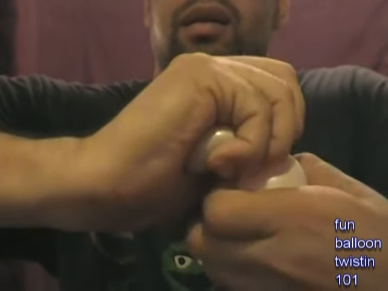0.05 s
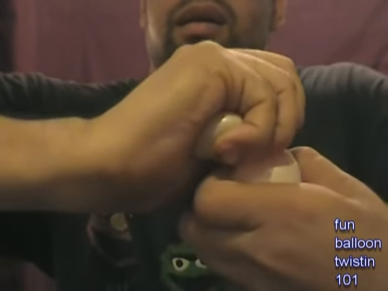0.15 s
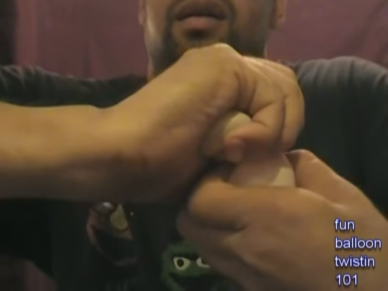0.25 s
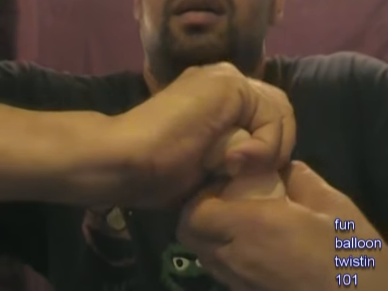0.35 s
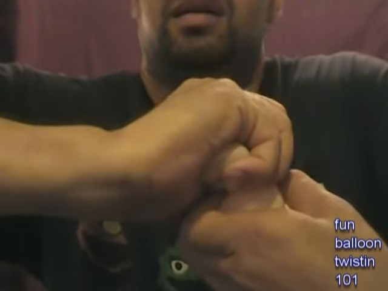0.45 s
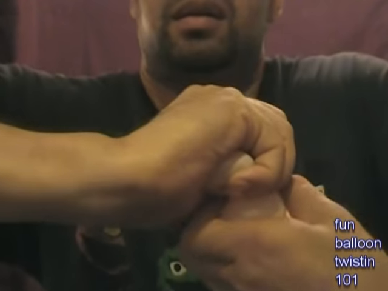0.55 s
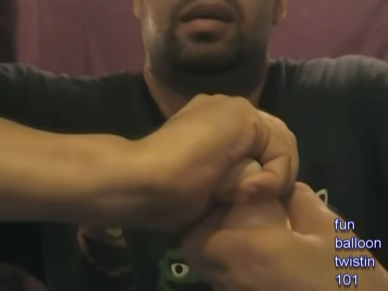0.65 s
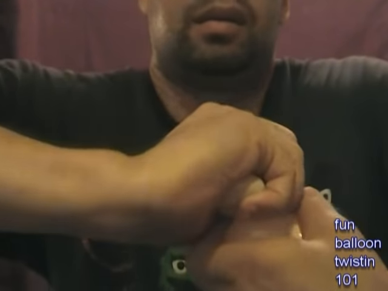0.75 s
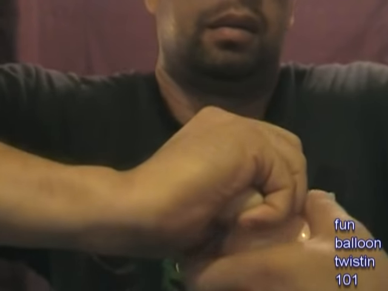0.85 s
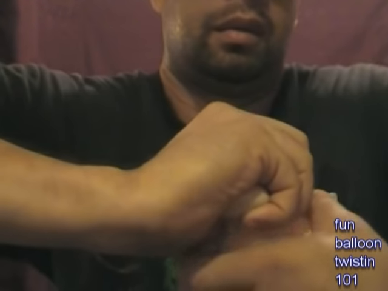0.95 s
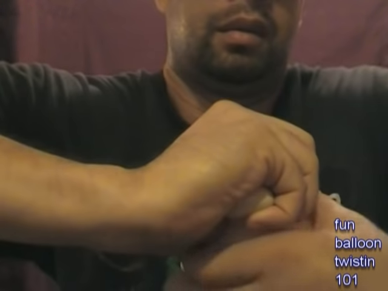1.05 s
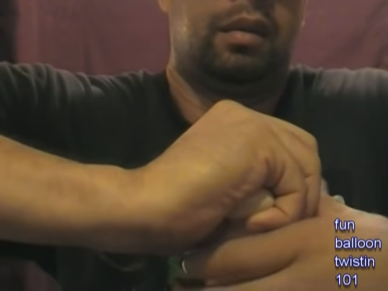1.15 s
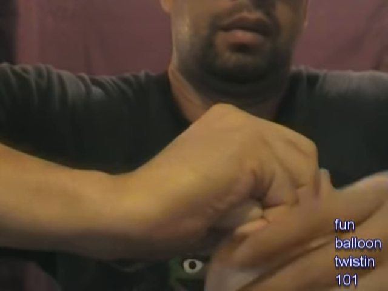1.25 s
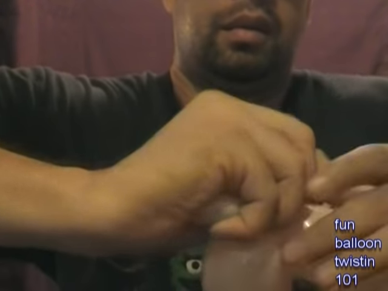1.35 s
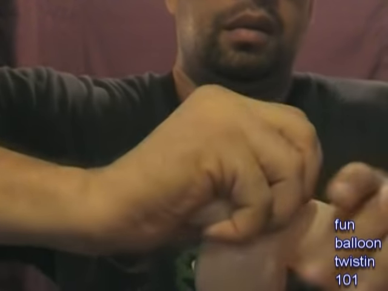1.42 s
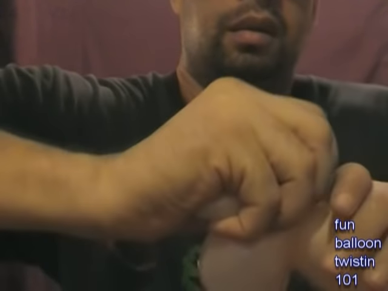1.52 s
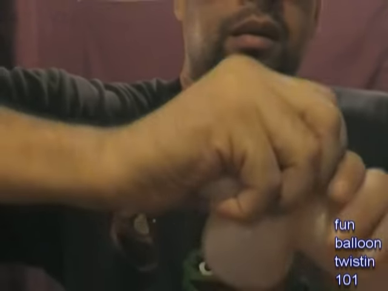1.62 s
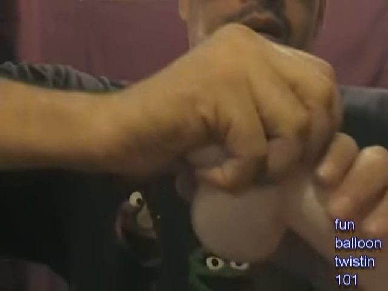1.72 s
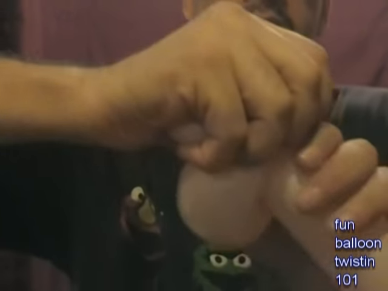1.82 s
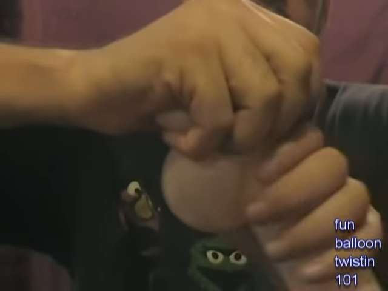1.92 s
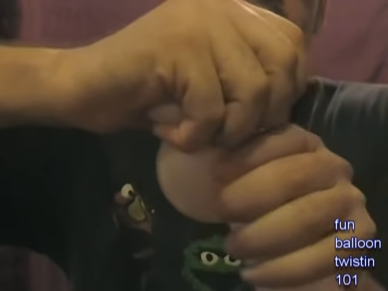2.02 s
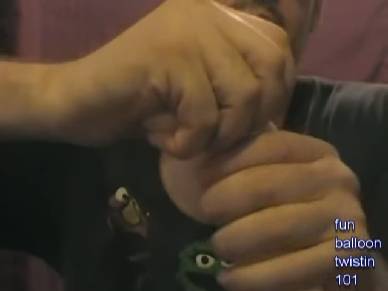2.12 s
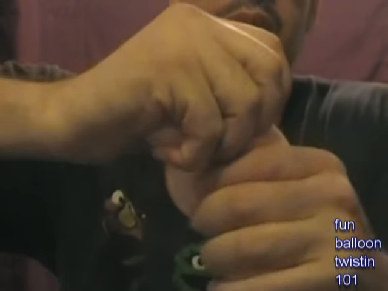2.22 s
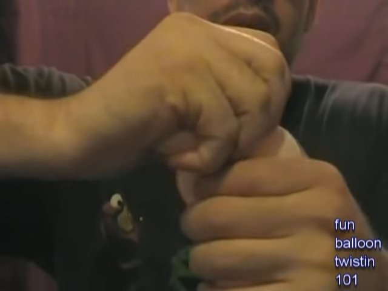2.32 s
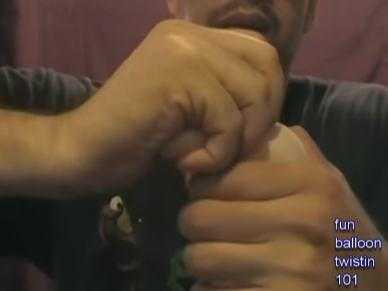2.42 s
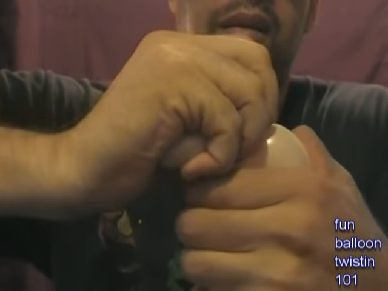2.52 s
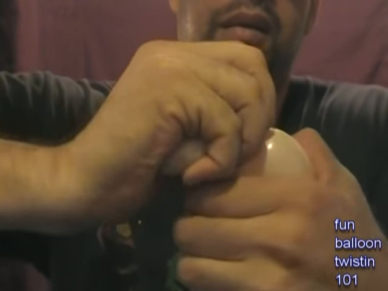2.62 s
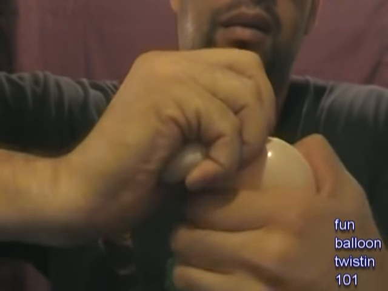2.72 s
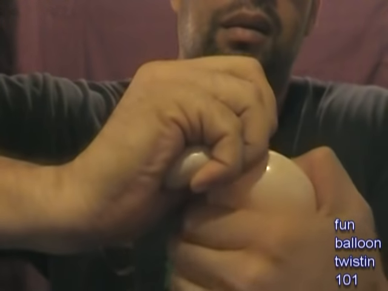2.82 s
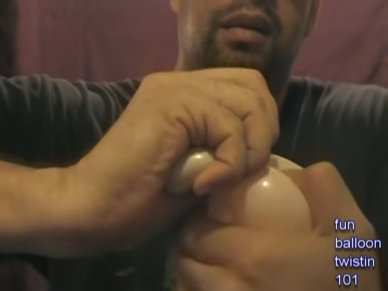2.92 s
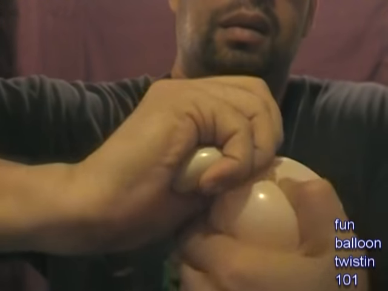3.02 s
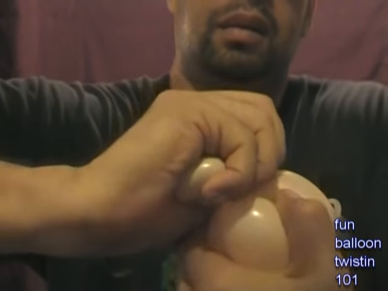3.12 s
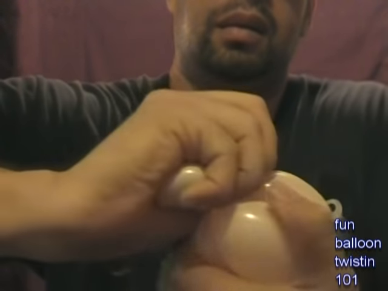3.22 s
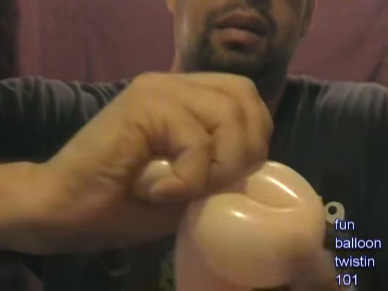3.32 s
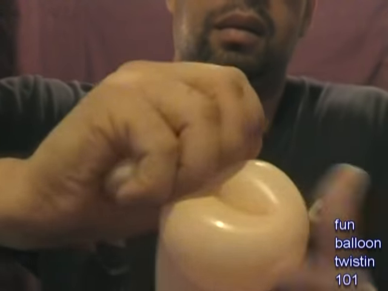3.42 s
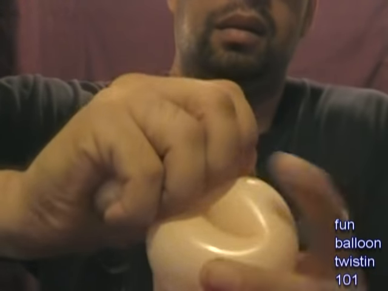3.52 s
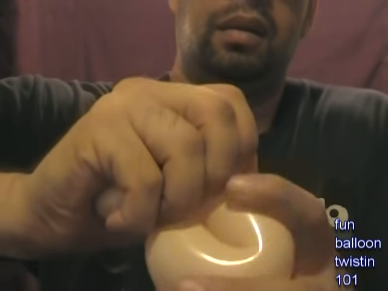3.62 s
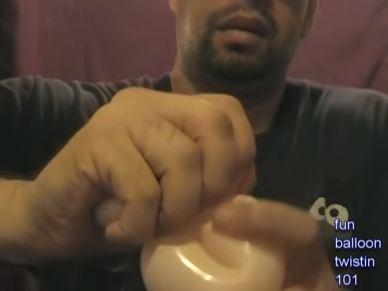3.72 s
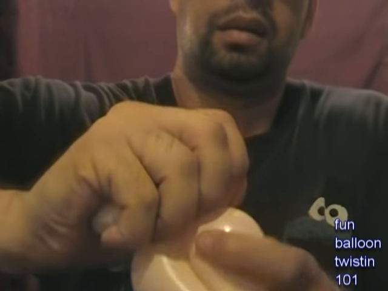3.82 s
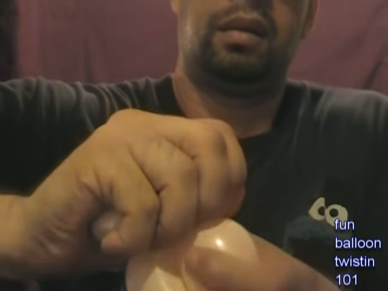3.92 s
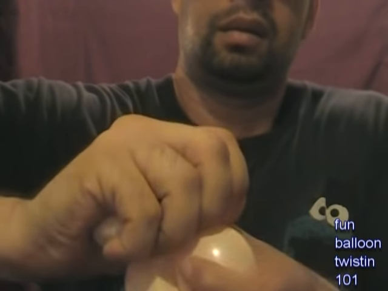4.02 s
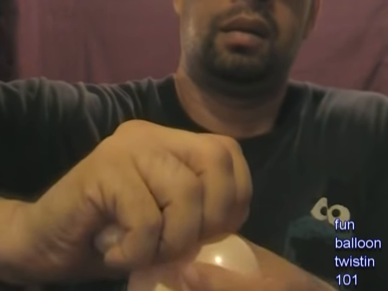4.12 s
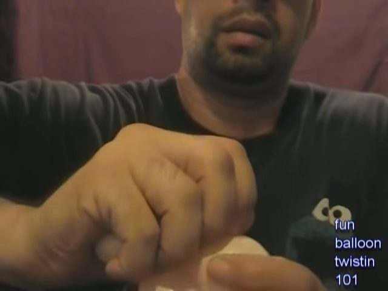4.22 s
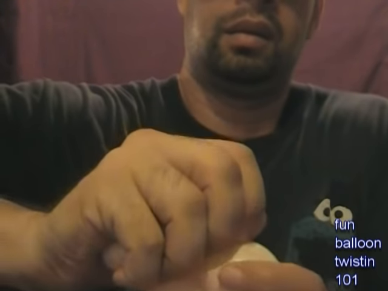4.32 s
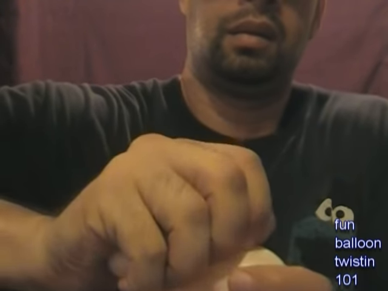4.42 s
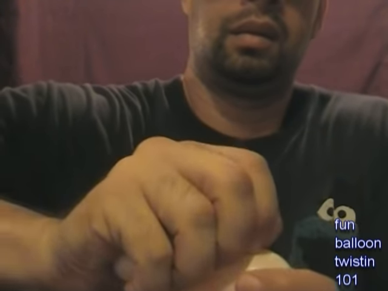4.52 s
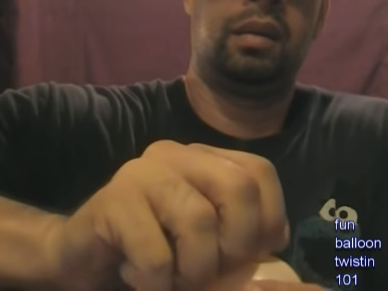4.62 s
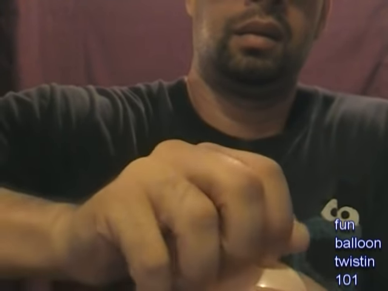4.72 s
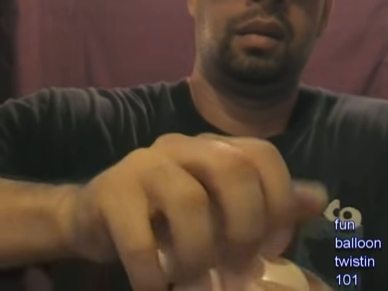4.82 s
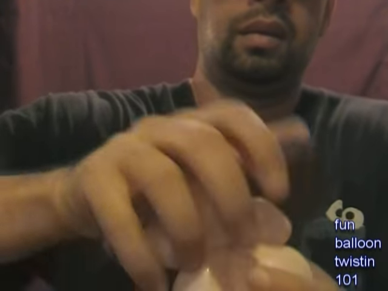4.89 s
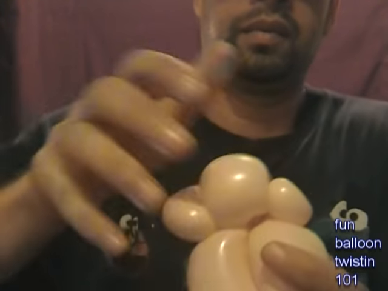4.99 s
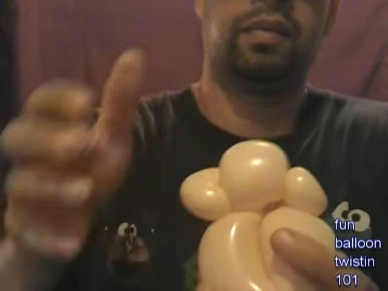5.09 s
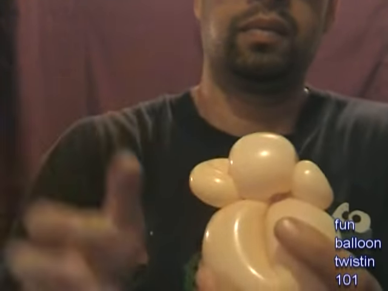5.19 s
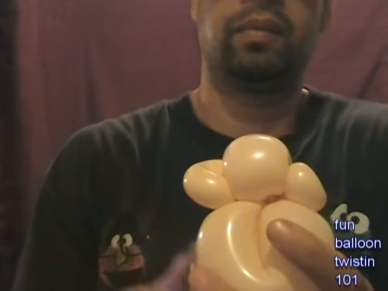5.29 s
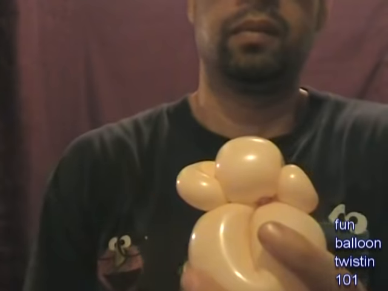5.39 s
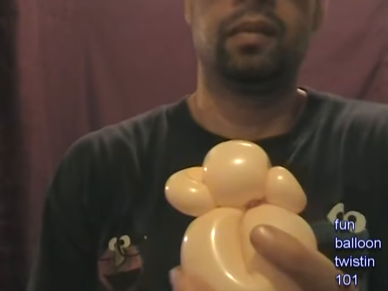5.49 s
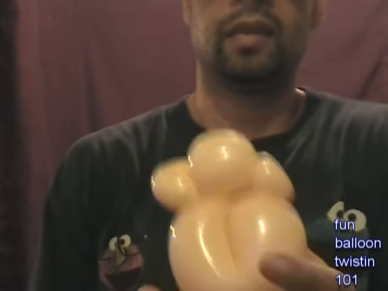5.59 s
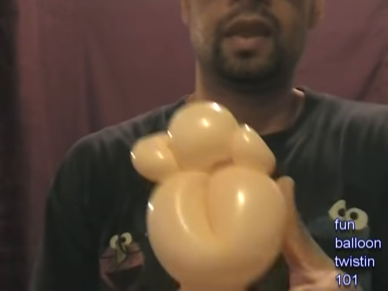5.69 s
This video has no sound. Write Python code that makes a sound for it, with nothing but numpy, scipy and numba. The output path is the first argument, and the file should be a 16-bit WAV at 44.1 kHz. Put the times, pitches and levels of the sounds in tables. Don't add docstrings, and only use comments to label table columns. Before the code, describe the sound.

An inflated balloon is squeezed and twisted by hand in a small damped room, heard very close in stereo. Scratchy rubs and sharp snaps come first, then a loud stuttering creak just after two seconds, a softer lull with knocks, more squeaks and a dense crinkling patch, and finally sparse fingertip ticks over faint room tone.

```python
import sys
import numpy as np
from scipy import signal
from scipy.fft import rfft, irfft, next_fast_len
from scipy.io import wavfile
from scipy.ndimage import uniform_filter1d
from numba import njit

SR = 44100
rng = np.random.default_rng(int(sys.argv[2]) if len(sys.argv) > 2 else 0)


def materialize(psi):
    bounded = np.clip(np.atleast_2d(psi).T, -1, 1)
    quanta = np.round(bounded * 32767).astype(np.int16)
    wavfile.write(sys.argv[1], SR, quanta)


def makeup_ratio(level_db):
    decades = np.asarray(level_db, float) / 20
    return 10 ** decades


N = 253575

# freq_hz, density_db
ROOM_TONE = [(24, -15), (40, -8), (144, -5), (180, -3.5), (402, -13), (1090, -11.5), (3740, -24.5),
             (7930, -33), (16000, -48)]
ROOM_TONE_DB = -59.5
ROOM_T60_S, ROOM_DB, ROOM_LOW_HZ, ROOM_HIGH_HZ = .15, -11, 78, 9600
# freq_hz, left_minus_right_db
PORT_TILT = [(150, -1), (380, 3), (1290, 1.5), (2380, 2.5), (4400, -1), (8100, -3), (13000, 4.5)]

# start_s, peak_db, pitch_hz, t60_s
HAND_KNOCKS = [(0.802, -40, 252, 0.056), (1.021, -48, 106, 0.19), (1.378, -27, 230, 0.04),
               (1.705, -25, 594, 0.026), (1.732, -24, 530, 0.033), (1.752, -23, 525, 0.036),
               (2.001, -29, 207, 0.041), (3.25, -25.5, 560, 0.046), (3.363, -34, 250, .04),
               (3.386, -36, 242, 0.058), (3.429, -35, 235, .1), (1.424, -36, 280, .04),
               (4.956, -31.5, 194, 0.031), (4.847, -16, 483, 0.014), (4.849, -32, 205, 0.041),
               (5.541, -20, 545, 0.015), (5.63, -22, 130, 0.14), (5.629, -38, 70, .07),
               (3.42, -55, 100, .2)]

# start_s, end_s, from_hz, to_hz, level_db
PINCHED_FOLDS = [(1.949, 1.988, 7300, 7100, -22), (0.249, 0.374, 8100, 8500, -30.5),
                 (0.824, 0.89, 840, 860, -36.5), (0.907, 1.001, 1400, 1980, -33),
                 (1, 1.029, 790, 780, -28.5), (1.269, 1.286, 1670, 1800, -44),
                 (1.533, 1.565, 1830, 1900, -33.5), (2.02, 2.129, 3090, 3140, -25),
                 (2.06, 2.135, 2120, 1810, -32.5), (2.06, 2.135, 4000, 4800, -27.5),
                 (2.4, 2.45, 7200, 6500, -34), (2.16, 2.36, 4100, 4300, -41), (2.9, 3.09, 3700, 3770, -32),
                 (3.76, 3.83, 8650, 8800, -33), (3.96, 4.0, 8300, 6500, -31), (1.83, 1.87, 4200, 4200, -34),
                 (4.25, 4.41, 3350, 3560, -36.5), (3.283, 3.325, 473, 360, -36.5),
                 (3.262, 3.335, 910, 670, -36), (3.37, 3.43, 1480, 1570, -46.5),
                 (3.37, 3.47, 5050, 4950, -37), (3.37, 3.47, 4200, 4240, -37),
                 (2.51, 2.59, 1100, 1090, -27), (4.18, 4.27, 2300, 2200, -33), (3.93, 4.0, 2000, 2100, -31),
                 (4.72, 4.78, 7000, 7100, -30), (2.92, 3.0, 2300, 2100, -30),
                 (3.641, 3.653, 3600, 3830, -22), (4.702, 4.764, 3800, 3640, -21),
                 (4.675, 4.786, 5800, 6700, -32), (4.865, 4.893, 6500, 6700, -35),
                 (4.918, 4.966, 2100, 1480, -33)]
FOLD_LOSS, FOLD_GRIP_HZ = .2, 40

# time_s, pitch_hz
BUBBLE_PITCH = [(0, 1320), (.75, 1620), (.85, 980), (1.05, 845), (1.1, 1430), (1.8, 1470), (2.0, 970),
                (2.47, 1010), (2.66, 1120), (2.85, 960), (3.15, 920), (3.25, 1190), (3.6, 1360),
                (3.72, 800), (4.1, 970), (4.7, 930), (4.95, 990), (5.75, 1170)]
BUBBLE_LOSS = .21
# freq_hz, width_hz, level_db
SKIN_MODES = [(1420, 360, 0), (2170, 600, -0.5), (2700, 523, 1.5), (3740, 1670, 8), (5440, 2100, 3)]
# freq_hz, width_hz, level_db
SIZZLE_MODES = [(5960, 1870, -3), (7710, 1650, 2), (9080, 2730, -0.5), (12400, 3070, -6.5),
                (12500, 1700, -19.5)]
# time_s, depth_db
HAND_HOLLOW = [(0, 0), (.3, -2), (.6, 0), (1.5, 0), (1.96, -3), (2.06, 0), (2.15, -5), (2.36, -5),
               (2.46, -1), (2.95, -1), (3.3, 0), (3.4, 1), (3.8, -1), (4.2, -2), (4.4, -2), (4.75, -2),
               (5.0, -1), (5.75, 0)]
HOLLOW_LOW_HZ, HOLLOW_HIGH_HZ = 4900, 6000

# time_s, bubble_coupling_db, skin_tautness_db, palm_pressure_db
HAND_GRIP = [(0, -12, -0.5, -7.5), (.3, -7.5, -1.5, -7), (.7, -6.5, 2, -6), (.95, -11, -1, 0),
             (1.1, 1, -0.5, 5.5), (1.45, 0, 6, 14), (1.8, -9, -2.5, -2.5), (1.96, -3, 1, 10),
             (2.08, -6.5, 1.5, -7), (2.3, -4, -2, -5), (2.6, -1.5, -1.5, 0), (2.95, -7, 2.5, -2),
             (3.3, -4.5, 2.5, 5.5), (3.65, -0.5, 5.5, 3), (3.85, -11, 3.5, -2), (4.3, -3, -2, -4),
             (4.85, -6, 2.5, 0.5), (5.75, 2.5, 2, 11)]
PUSH_LOW_HZ, PUSH_HIGH_HZ = 264, 568
PUSH_DB, PUSH_MAX_DB, PUSH_STEADY, PUSH_SMOOTH_S = -14, -1.5, 0.53, 0.06

# start_s, end_s, start_db, end_db
RUB_STROKES = [(.052, .068, -26, -28.5), (.08, .376, -30.5, -34.5), (.48, .53, -28.5, -31.5),
               (.84, 1.03, -27.5, -28), (.958, .962, -20, -19.5), (1.278, 1.282, -42, -51),
               (1.372, 1.378, -41.5, -45.5), (1.668, 1.883, -38, -23), (2.025, 2.062, -17.5, -16),
               (2.07, 2.495, -16.5, -15.5), (2.525, 2.58, -8, -16.5), (2.804, 2.945, -27.5, -19),
               (2.945, 3.07, -20, -22.5), (3.14, 3.225, -48, -46), (3.235, 3.25, -35, -35),
               (3.285, 3.3, -37, -32), (3.683, 3.781, -37.5, -24), (3.781, 3.909, -24.5, -28),
               (3.909, 3.985, -34.5, -21.5), (4.385, 4.46, -21.5, -38), (4.8, 4.91, -35.5, -37.5),
               (4.92, 4.96, -28.5, -32)]
# start_s, end_s, start_db, end_db
GRAB_STROKES = [(0, .017, -20, -22), (.567, .616, -26.5, -32), (.622, .762, -24.5, -42),
                (1.088, 1.125, -23.5, -28), (1.399, 1.441, -36.5, -35.5), (1.441, 1.52, -32, -45),
                (1.948, 1.985, -19.5, -27), (2.641, 2.745, -19.5, -21), (2.761, 2.804, -16, -17),
                (3.364, 3.432, -36, -30), (3.551, 3.556, -31, -42), (4.16, 4.182, -49, -35),
                (4.182, 4.351, -21, -44), (4.49, 4.507, -27, -23.5), (4.597, 4.7, -29.5, -20),
                (5.145, 5.2, -46.5, -65.5), (5.344, 5.53, -72, -69), (5.536, 5.627, -43, -63.5),
                (5.629, 5.632, -19, -36)]
# start_s, end_s, start_db, end_db
JERK_STROKES = [
    (.378, .382, -21.5, -15),
    (.791, .793, -28, -17),
    (.812, .815, -47.5, -17.5),
    (3.249, 3.26, -26, -32),
    (1.528, 1.548, -21.5, -23),
    (1.55, 1.575, -33, -33.5),
    (3.597, 3.618, -20, -21),
    (3.624, 3.652, -32, -26.5),
    (4.69, 4.742, -23, -19.5),
    (4.749, 4.783, -17.5, -21.5),
]
SWELL_DB_PER_S, GRAB_DB_PER_S, LET_GO_DB_PER_S, STOP_DB_PER_S = 396.5, 9000, 381, 1313
GRAINS_PER_S, GRAIN_SPREAD_DB, CLUMP_DB = 5000, 3.6, 2.2
STUCK_DB = -11

# start_s, peak_db
BUBBLE_SNAP_TIMES = [(0.1224, -11), (0.2326, -17), (0.4105, -7), (.435, -7.5), (0.4499, -10), (0.4599, -12),
                     (0.5803, -9.5), (0.6217, 5), (0.7255, -13), (.7947, -4), (.8114, -9.5), (1.0004, -5.5),
                     (1.436, -14), (1.4876, -15), (1.5231, -14), (1.6614, -13.5), (1.7059, -13),
                     (1.7512, -13), (2.632, -8), (3.0256, -6), (3.8293, -32), (3.8821, -16), (4.008, -3),
                     (4.311, -11.5), (4.3314, -11.5), (4.435, -9.5), (4.4889, -7.5), (4.5132, -12),
                     (4.691, -17.5), (4.956, 0)]
# start_s, peak_db
SKIN_SNAP_TIMES = [(0.1882, -4.5), (0.223, -11.5), (.257, -5), (0.301, -9), (0.3052, -7), (0.3371, -6),
                   (.3834, -8), (0.5649, -6), (0.5915, -2), (0.8346, -0.5), (0.8409, -8), (0.958, -12),
                   (1.085, -18), (1.3982, -9.5), (1.4448, -9.5), (3.3632, -14.5), (3.5992, -8), (3.646, -5),
                   (3.926, -8), (3.94, -2), (4.159, -10.5), (4.263, -9.5), (4.3725, -4.5), (4.379, -6),
                   (4.502, -7), (4.6166, -9.5), (4.672, -9), (4.8149, -12), (4.8488, -7), (5.6293, -4)]
# start_s, peak_db
CREASE_CRINKLES = [(0.0123, -9), (0.166, -17), (0.2283, -14), (.248, -18), (0.368, -11), (0.3983, -13),
                   (.467, -15), (0.477, -18), (.627, -11), (0.675, -16.5), (.819, -5), (0.853, -17),
                   (0.8618, -15), (.9502, -13), (0.965, -13), (1.0915, -19), (1.1, -15), (1.4227, -18),
                   (1.4614, -20), (1.7654, -15), (1.7852, -16), (2.6407, -12), (2.7318, -10),
                   (2.8637, -11.5), (2.8836, -9), (2.915, -8), (2.93, -9), (2.938, -8), (3.3734, -12.5),
                   (3.78, -19), (3.863, -9), (3.8995, -15), (3.9153, -17), (4.228, -10), (4.2363, -17),
                   (4.2415, -16), (4.2526, -17), (4.2765, -15), (4.285, -17.5), (4.2933, -19),
                   (4.299, -12.5), (4.315, -9), (4.3205, -11), (4.3386, -8.5), (4.3567, -14), (4.367, -9),
                   (4.3876, -9), (4.3951, -9), (4.3992, -12), (4.4072, -13), (4.4276, -16), (4.4749, -26),
                   (4.63, -11.5), (4.64, -14), (4.654, -8), (4.703, -7.5), (4.73, -8), (4.833, -17),
                   (4.8393, -16), (4.9178, -18)]
BUBBLE_SNAP_RING_DB, SKIN_SNAP_RING_DB, CRINKLE_RING_DB = -7.5, -25.5, -14
# start_s, peak_db, rel_ring_db
FINGER_TICKS = [(0.7671, -22, -2), (1.473, -11, -19), (3.4875, -30, -36), (1.2505, -18, -18),
                (1.2757, -12.5, -34), (1.3276, -24, -29), (3.2126, -23.5, -23), (3.2224, -33, -28),
                (3.2335, -25, -19), (3.5312, -37, -1), (3.5499, -21.5, -37), (4.1, -29, -10),
                (4.1043, -35, -28), (4.5547, -13.5, -36), (4.593, -26, -26), (4.9089, -16.5, -10),
                (5.144, -26.5, -9), (5.166, -27.5, -6), (5.237, -36, -7), (5.301, -30, -7), (5.303, -34, 0),
                (5.3421, -15, -8), (5.5151, -35.5, 5.5), (5.5349, -28, -19), (5.543, -14, -17),
                (5.547, -28, -10), (5.575, -30, 0)]

# time_s, slips_per_s, peak_db, rel_ring_db
NECK_CREAKS = [
    [(2.0649, 205, -9, -9), (2.085, 170, -5, -9), (2.098, 210, -6, -9)],
    [(2.1013, 250, -4, -8), (2.126, 220, -7, -8), (2.14, 275, -11, -5), (2.155, 160, -11, -2),
     (2.186, 143, -10, -2)],
    [(2.1891, 220, -6, -2), (2.2, 120, -9, -2), (2.215, 120, -7, -2), (2.225, 165, -8, -2),
     (2.245, 162, -9, -2), (2.26, 138, -10, -2), (2.28, 138, -8, -2)],
    [(2.2833, 215, -6, -2), (2.292, 205, -9, -2), (2.3, 130, -9, -2), (2.314, 200, -10, -2)],
    [(2.3163, 105, -6, -2), (2.335, 80, -9, -2), (2.352, 100, -11, -2), (2.365, 142, -10, -2),
     (2.392, 135, -9, -2), (2.4, 80, -10, -2), (2.43, 80, -11, -2)],
    [(2.4333, 80, -7, -2), (2.447, 195, -10, -3), (2.462, 130, -10, -3), (2.475, 80, -11, -3),
     (2.49, 130, -15, -6), (2.51, 60, -16, -9)],
    [(2.513, 82, -11, -3), (2.535, 82, -9, -3), (2.543, 140, -10, -3), (2.555, 85, -10, -3),
     (2.575, 115, -11, -3), (2.59, 30, -10, -4)],
    [(2.7611, 190, -13, -12), (2.773, 240, -9, -13), (2.793, 180, -12, -12), (2.8, 124, -11, -11),
     (2.845, 124, -13, -12)],
]
# time_s, slips_per_s, peak_db, rel_ring_db
FINGER_CREAKS = [
    [(1.9478, 210, -10, -22), (1.958, 280, -11, -22), (1.979, 230, -10, -22)],
    [(3.3775, 150, -15, -24), (3.41, 145, -17, -24), (3.44, 125, -20, -24), (3.465, 95, -19, -24)],
    [(4.1674, 200, -14, -26), (4.181, 250, -11, -26), (4.195, 170, -10, -24), (4.205, 145, -7, -22),
     (4.215, 200, -11, -20), (4.22, 200, -10, -20)],
    [(4.598, 300, -16, -21), (4.62, 230, -16, -21), (4.67, 230, -15, -21)],
]
# time_s, slips_per_s, peak_db, rel_ring_db
RUB_CREAKS = [
    [(1.8168, 240, -15, -20), (1.85, 250, -17, -20), (1.897, 170, -14, -14)],
    [(2.0027, 170, -11, -14), (2.017, 150, -13, -14)],
    [(2.9952, 130, -9, -14), (3.03, 125, -8, -12), (3.062, 170, -12, -14), (3.072, 110, -12, -14),
     (3.112, 120, -19, -14)],
    [(3.9423, 230, -11, -18), (3.952, 160, -13, -18), (4.0, 125, -12, -18)],
]
# time_s, slips_per_s, peak_db, rel_ring_db
LOOSE_CRACKLES = [
    [(1.6737, 100, -17, -16), (1.7, 70, -23, -20)],
]
NECK_UNEVEN, FINGER_UNEVEN, CRACKLE_UNEVEN = .04, .03, .2
LOUDEST_DB = -3


def rms_one(x):
    return x / np.sqrt(np.mean(x ** 2) + 1e-20)


def at_hz(points, hz):
    points_hz, points_db = np.transpose(points)
    return np.interp(np.log(hz + 1), np.log(points_hz), points_db)


def in_time(rows):
    time_s, *columns = np.transpose(rows)
    return [np.interp(np.arange(N) / SR, time_s, column) for column in columns]


def band(x, low_hz, high_hz):
    sos = signal.butter(2, [low_hz, min(high_hz, .45 * SR)], "band", fs=SR, output="sos")
    return signal.sosfilt(sos, x + 1e-18)


def drift(rate_hz):
    r = np.exp(-2 * np.pi * rate_hz / SR)
    noise = rng.standard_normal(N + 4000)
    return rms_one(signal.lfilter([1], [1, -2 * r, r * r], noise)[4000:])


def air():
    hz = np.fft.rfftfreq(N, 1 / SR)
    spectrum = rfft(rng.standard_normal((2, N))) * makeup_ratio(at_hz(ROOM_TONE, hz))
    return makeup_ratio(ROOM_TONE_DB) * rms_one(irfft(spectrum, N))


def room(x):
    t = np.arange(int(.3 * SR)) / SR
    decay = makeup_ratio(-60 * t / ROOM_T60_S)
    onset = np.clip((t - .002) / 0.0041, 0, 1)
    shared, apart = rng.standard_normal((2, len(t))) * decay * onset
    apart = 0.17 * band(apart, 8100, 14000) + 0.44 * apart + 0.67 * band(apart, 40, 280)
    tails = band(np.array([shared + apart, shared - apart]), ROOM_LOW_HZ, ROOM_HIGH_HZ)
    tails = makeup_ratio(ROOM_DB) * tails / np.sqrt(np.sum(tails ** 2) / 2)
    return signal.fftconvolve(x[None], tails, axes=1)[:, :N]


def knocks():
    out = np.zeros(N + SR)
    t = np.arange(SR // 4) / SR
    for start_s, peak_db, hz, t60_s in HAND_KNOCKS:
        push = 1 - np.exp(-t * hz / 0.31)
        ring = makeup_ratio(peak_db - 60 * t / t60_s) * push * np.sin(2 * np.pi * hz * t)
        out[round(start_s * SR):][:len(t)] += band(ring, .4 * hz, 6 * hz)
    return out[:N]


def resonance(x, hz, width_hz):
    r, w = np.exp(-np.pi * width_hz / SR), 2 * np.pi * hz / SR
    return signal.lfilter([1, -r * np.cos(w)], [1, -2 * r * np.cos(w), r * r], x + 1e-18)


@njit
def gliding_ring(x, hz, r):
    y = np.zeros(len(x))
    for i in range(2, len(x)):
        w = 2 * np.pi * hz[i] / SR
        y[i] = x[i] * np.sin(w) + 2 * r[i] * np.cos(w) * y[i - 1] - r[i] ** 2 * y[i - 2]
    return y


def folds(clicks):
    out = np.zeros(N)
    for start_s, end_s, from_hz, to_hz, level_db in PINCHED_FOLDS:
        i, j = round(start_s * SR), round(end_s * SR)
        hz = np.geomspace(from_hz, to_hz, j - i)
        width_hz = FOLD_LOSS * from_hz + FOLD_GRIP_HZ
        r = np.full(j - i, np.exp(-np.pi * width_hz / SR))
        ring = gliding_ring(gliding_ring(np.gradient(clicks[i:j]), hz, r), hz, r)
        out[i:j] += makeup_ratio(level_db) * signal.windows.tukey(j - i, .3) * rms_one(ring)
    return out


def bubble_air(clicks, hz, second_db):
    first = gliding_ring(clicks, hz, np.exp(-np.pi * BUBBLE_LOSS * hz / SR))
    second = gliding_ring(clicks, 1.84 * hz, np.exp(-np.pi * 1.6 * BUBBLE_LOSS * hz / SR))
    return band(band(first + makeup_ratio(second_db) * second, 800, 5000), 600, 9000)


def skin(clicks, modes, spread_db):
    luck = makeup_ratio(spread_db * np.clip(rng.standard_normal((len(modes), N)), -3, 1.3))
    out = np.zeros(N)
    for k, (hz, width_hz, level_db) in enumerate(modes):
        out += (-1) ** k * makeup_ratio(level_db) * resonance(clicks * luck[k], hz, width_hz)
    return out


def hollow(x):
    depth_db, = in_time(HAND_HOLLOW)
    b, a = signal.butter(1, (HOLLOW_LOW_HZ, HOLLOW_HIGH_HZ), "band", fs=SR)
    return x + (makeup_ratio(depth_db) - 1) * signal.lfilter(b, a, x)


def effort():
    t = np.arange(0, N + 20, 20) / SR
    kinds = [(RUB_STROKES, SWELL_DB_PER_S, LET_GO_DB_PER_S),
             (GRAB_STROKES, GRAB_DB_PER_S, LET_GO_DB_PER_S),
             (JERK_STROKES, GRAB_DB_PER_S, STOP_DB_PER_S)]
    strongest_db = np.full(len(t), -95.)
    for rows, rise, fall in kinds:
        for start_s, end_s, from_db, to_db in rows:
            stroke_db = np.interp(t, [start_s, max(end_s, start_s + .001)], [from_db, to_db])
            stroke_db -= rise * np.maximum(start_s - t, 0) + fall * np.maximum(t - end_s, 0)
            strongest_db = np.maximum(strongest_db, stroke_db)
    return np.interp(np.arange(N) / SR, t, strongest_db)


def gripping():
    t = np.arange(N) / SR
    held = np.zeros(N)
    for run in NECK_CREAKS + FINGER_CREAKS:
        held[(t > run[0][0]) & (t < run[-1][0] + .004)] = 1
    return uniform_filter1d(held, size=300)


def scratch(effort_db, ring_db, sizzle_db, push_db, ring_hz):
    sizes = makeup_ratio(GRAIN_SPREAD_DB * np.minimum(rng.exponential(1, N), 3.2)) * rng.choice([-1, 1], N)
    born = rng.random(N) < GRAINS_PER_S / SR
    clumps_db = CLUMP_DB * np.minimum(drift(300), 2) + 1.0 * drift(11.6)
    grains = sizes * born * makeup_ratio(clumps_db)
    ring = bubble_air(grains, ring_hz, second_db=-11.5)
    middle = band(skin(grains, SKIN_MODES, spread_db=12.5), 1224, 5760)
    bright = band(skin(grains, SIZZLE_MODES, spread_db=3.5), 2740, 12800)
    push = band(grains, PUSH_LOW_HZ, PUSH_HIGH_HZ)
    bright = makeup_ratio(effort_db + sizzle_db - 5.5) * rms_one(bright)
    dull = rms_one(middle) + makeup_ratio(ring_db) * rms_one(ring) + makeup_ratio(push_db - 6.5) * rms_one(push)
    return makeup_ratio(effort_db - 3.0) * dull + bright, bright, grains


def creak_slips(runs, uneven):
    rows = []
    for run in runs:
        time_s, slips_per_s, peak_db, ring_db = np.transpose(run)
        t = np.arange(time_s[0], time_s[-1], 1 / SR)
        load = np.cumsum(np.interp(t, time_s, slips_per_s)) / SR
        at_s = np.interp(np.arange(int(load[-1]) + 1), load, t)
        time_luck, peak_luck = rng.standard_normal((2, len(at_s)))
        at_s = at_s + uneven * time_luck / np.interp(at_s, time_s, slips_per_s)
        peaks_db = np.interp(at_s, time_s, peak_db) + 10 * uneven * peak_luck
        rows += zip(at_s, peaks_db, np.interp(at_s, time_s, ring_db))
    return rows


def snaps():
    rows = [(s, db, BUBBLE_SNAP_RING_DB) for s, db in BUBBLE_SNAP_TIMES]
    rows += [(s, db, SKIN_SNAP_RING_DB) for s, db in SKIN_SNAP_TIMES]
    rows += [(s, db, CRINKLE_RING_DB) for s, db in CREASE_CRINKLES]
    return rows + FINGER_TICKS + creak_slips(LOOSE_CRACKLES, CRACKLE_UNEVEN)


def slips(rows, ring_hz, rattle_share, spread_db, hardest_db):
    start_s, peak_db, ring_db = np.transpose(rows)
    at = np.round(start_s * SR).astype(int)
    peak_db = np.minimum(peak_db, LOUDEST_DB)
    crack, kick = np.zeros(N), np.zeros(N)
    crack[at] = -makeup_ratio(peak_db)
    kick[at] = -makeup_ratio(np.minimum(peak_db + ring_db, hardest_db) + 4.0)
    fade = np.exp(-1 / (.0015 * SR))
    sparse_noise = rng.standard_normal(N) * (rng.random(N) < .3)
    rattle = signal.lfilter([0, rattle_share], [1, -fade], crack) * sparse_noise
    bright = makeup_ratio(-1.5) * band(skin(crack + rattle, SIZZLE_MODES, spread_db), 1400, 13400)
    middle = makeup_ratio(-10.5) * band(skin(crack + rattle, SKIN_MODES, spread_db), 1520, 5300)
    ring = bubble_air(kick, ring_hz, second_db=-9.0)
    push = 1.94 * band(kick, PUSH_LOW_HZ, PUSH_HIGH_HZ)
    return middle + ring + bright + push, bright, crack


def scene():
    ring_hz, = in_time(BUBBLE_PITCH)
    effort_db = effort()
    slow_db = uniform_filter1d(effort_db, size=int(PUSH_SMOOTH_S * SR))
    ring_db, sizzle_db, palm_db = in_time(HAND_GRIP)
    push_db = palm_db + np.minimum(PUSH_DB - PUSH_STEADY * (slow_db + 30), PUSH_MAX_DB)
    rub_db = effort_db + STUCK_DB * gripping()
    rub, rub_bright, grains = scratch(rub_db, ring_db, sizzle_db, push_db, ring_hz)
    snap, snap_bright, _ = slips(snaps(), ring_hz, rattle_share=.35, spread_db=3.0, hardest_db=-14)
    runs = creak_slips(NECK_CREAKS, NECK_UNEVEN) + creak_slips(FINGER_CREAKS + RUB_CREAKS, FINGER_UNEVEN)
    creak, creak_bright, cracks = slips(runs, ring_hz, rattle_share=.12, spread_db=1.5, hardest_db=-8)
    balloon = hollow(rub + snap + creak) + folds(grains + 400 * cracks) + knocks()
    wander = 0.59 * drift(300) * band(rub_bright + snap_bright + creak_bright, 7740, 12100)
    return balloon + wander * [[1], [-1]] + room(balloon) + air()


def top_cut(x):
    return signal.sosfilt(signal.butter(12, 16490, fs=SR, output="sos"), x)


def record(dry):
    size = next_fast_len(N)
    tilt_db = at_hz(PORT_TILT, np.fft.rfftfreq(size, 1 / SR)) / 2
    ports = irfft(rfft(dry, size) * makeup_ratio([tilt_db, -tilt_db]), size)[:, :N]
    ports = 1.4 * np.tanh(ports / 1.4)
    ports = signal.sosfilt(signal.butter(1, 120, "high", fs=SR, output="sos"), ports)
    ports = signal.sosfilt(signal.cheby2(5, 20, 16500, fs=SR, output="sos"), ports)
    return top_cut(ports)


dry = scene()
out = record(dry)
materialize(out)
```